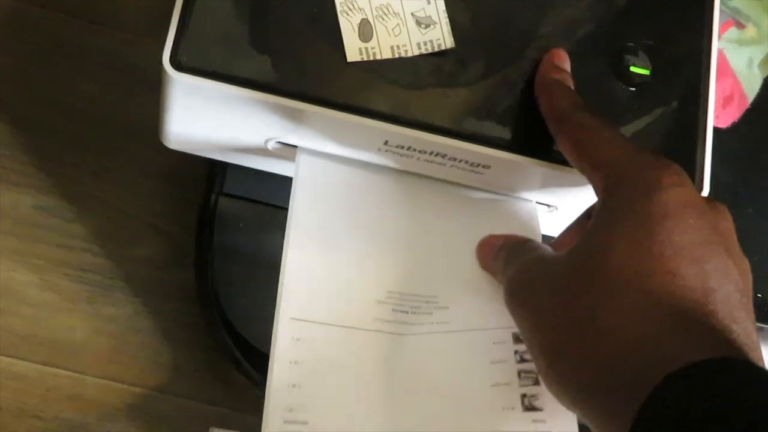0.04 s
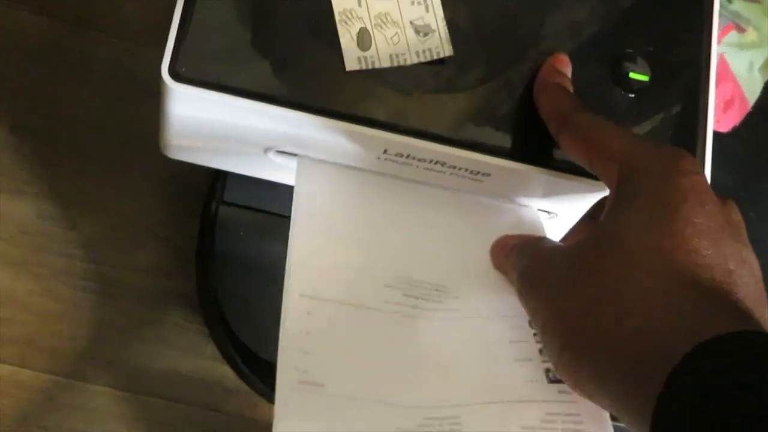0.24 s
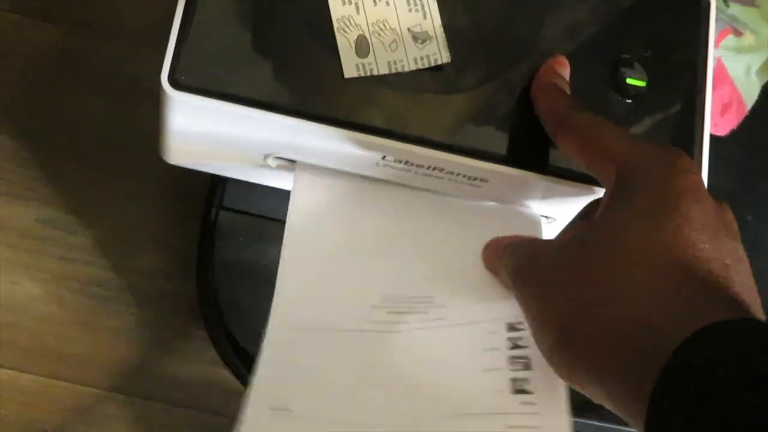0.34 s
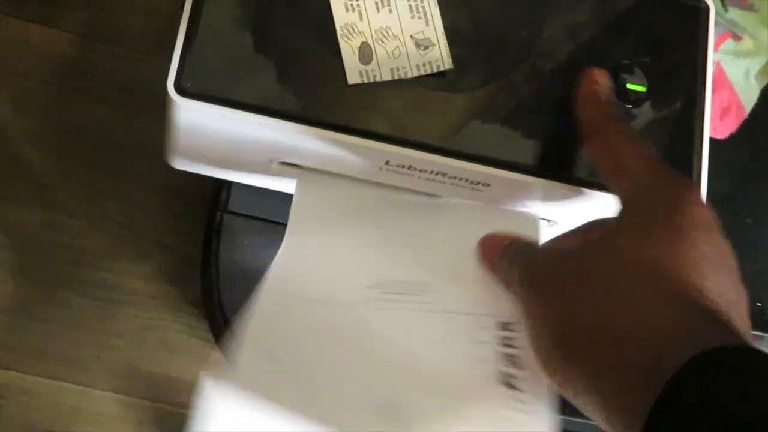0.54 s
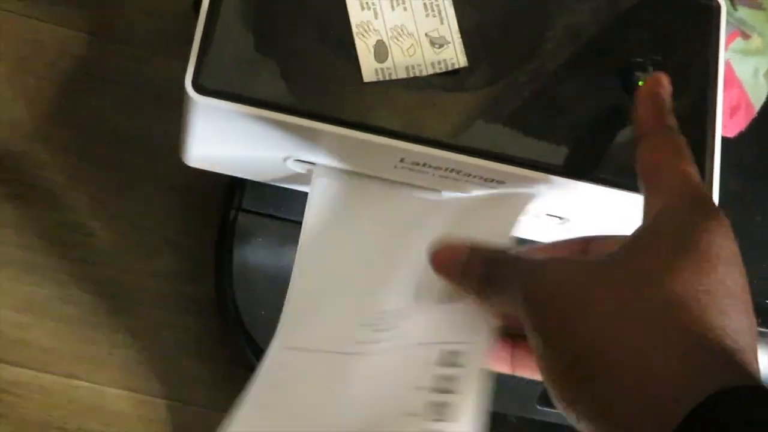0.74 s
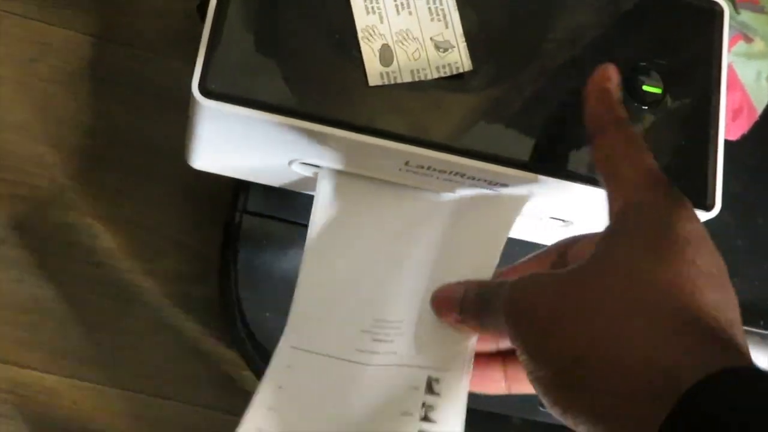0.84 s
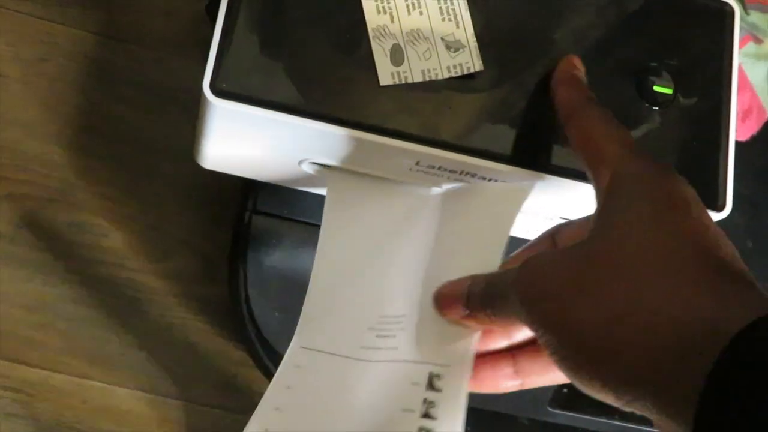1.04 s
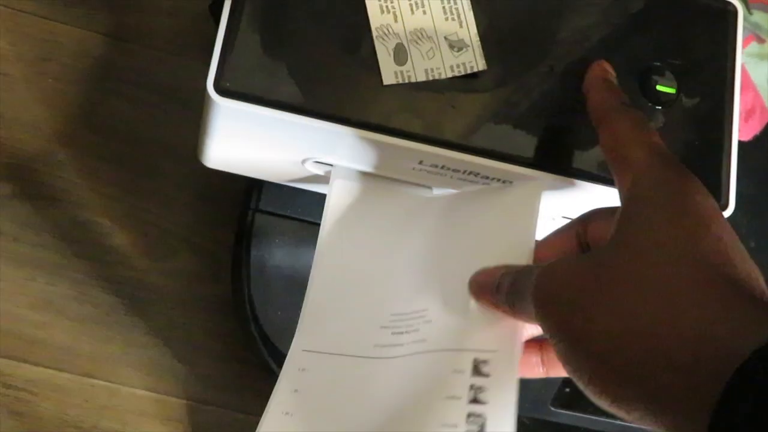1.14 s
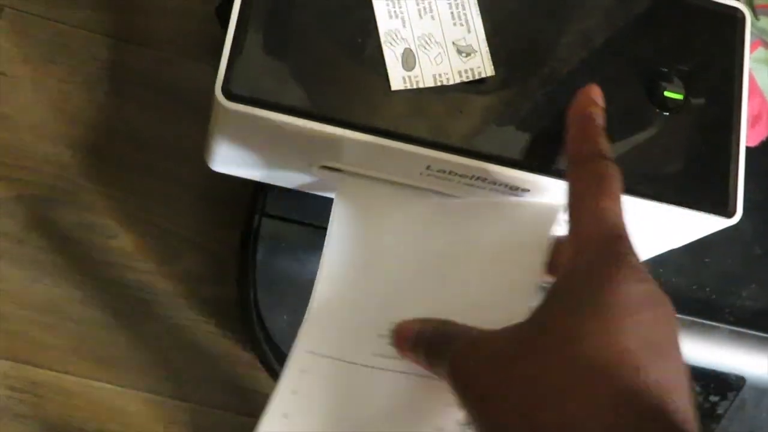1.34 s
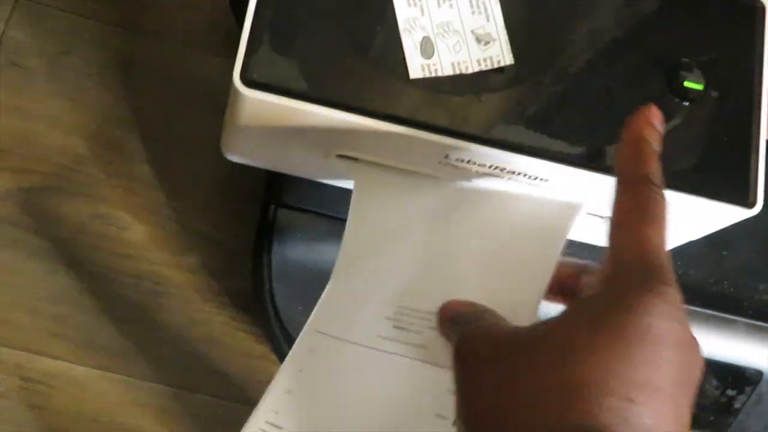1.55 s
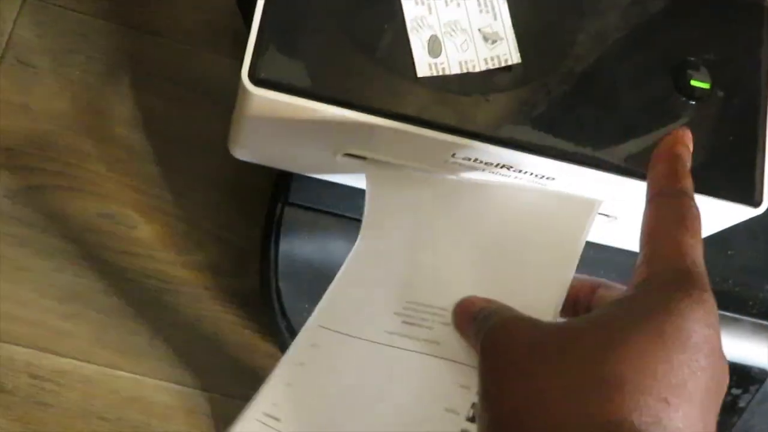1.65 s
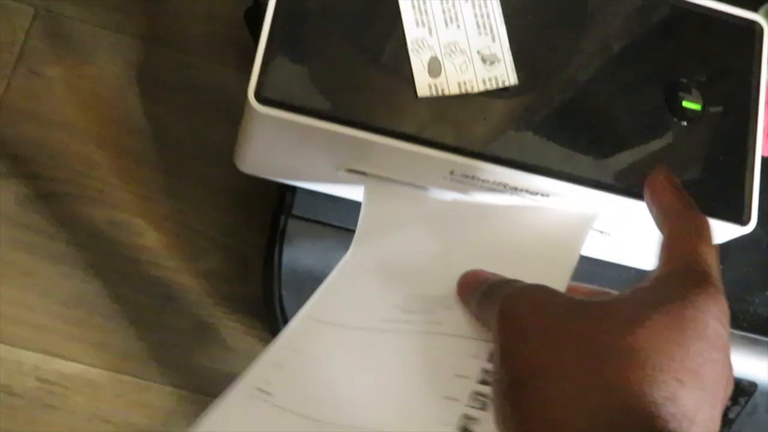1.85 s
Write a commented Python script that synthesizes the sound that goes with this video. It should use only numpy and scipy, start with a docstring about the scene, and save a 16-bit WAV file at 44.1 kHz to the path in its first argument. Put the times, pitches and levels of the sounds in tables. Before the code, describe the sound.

A paper label rips off a small printer in a quick loud burst, then crinkles faintly.

```python
"""In a small, quiet room, a paper label is torn along its perforation at a small printer, close by.
The printer drones and its roller creaks; then the paper bridges snap one by one, each a decaying
cosine pop with a noise crack. Fingers shift their grip: the slip crinkles in clumps of noise grains,
slides over the plastic case as clumped hiss and taps it, ringing its modes. A noise tail is the room."""
import sys
import numpy as np
from scipy import signal
from scipy.fft import rfft, irfft
from scipy.io import wavfile
from scipy.ndimage import uniform_filter1d

SR = 44100
rng = np.random.default_rng(int(sys.argv[2]) if len(sys.argv) > 2 else 0)


def store_pcm(level_fs):
    """Save levels as 16-bit WAV."""
    pcm = np.round(np.clip(level_fs, -1, 1) * 32767).astype(np.int16)
    wavfile.write(sys.argv[1], SR, np.atleast_2d(pcm).T)


N = 83790
T = np.arange(N) / SR


def amp(db):
    """Decibels to linear gain."""
    return 10 ** (np.asarray(db) / 20)


def unit(x):
    """Scale to an RMS of one."""
    return x / np.sqrt(np.mean(x ** 2) + 1e-20)


def read(points, hz):
    """Read a curve of (frequency, value) points along a log frequency axis."""
    f, value = np.transpose(points)
    return np.interp(np.log(hz + 1), np.log(f + 1), value)


def level(points):
    """Gain over time from (time [s], level [dB]) points."""
    return amp(np.interp(T, *np.transpose(points)))


def add(mix, s, sound):
    """Mix a sound in at s seconds, cut off at the end of the mix."""
    part = mix[round(s * SR):][:len(sound)]
    part += sound[:len(part)]


def colour(x, points, even=False, size=4096):
    """Causal filter through (frequency [Hz], gain [dB]) points; even keeps the power of white noise."""
    log_gain = np.log(amp(read(points, abs(np.fft.fftfreq(size, 1 / SR)))))
    minimum_phase = np.exp(np.conj(signal.hilbert(log_gain)))
    taps = np.fft.ifft(minimum_phase).real[:size // 2]
    if even:
        taps = taps / np.linalg.norm(taps)
    return signal.fftconvolve(x, taps)[:len(x)]


def resonances(x, modes):
    """Ring modes given as (frequency [Hz], gain at the peak [dB], t60 [s])."""
    out = np.zeros(len(x))
    for hz, db, t60 in modes:
        pole = amp(-60 / (t60 * SR))
        spin = np.exp(2j * np.pi * hz / SR)
        ringing = signal.lfilter([1 - pole], [1, -pole * spin], x + 1e-18)
        out += 2 * amp(db) * ringing.real
    return out


def grains(per_s, spread_db, smooth_share):
    """Tiny fibre clicks of uneven size over a smooth hiss."""
    sizes = amp(spread_db * np.minimum(rng.exponential(1, N), 3))
    clicks = sizes * rng.choice([-1, 1], N) * (rng.random(N) < per_s / SR)
    return unit(unit(clicks) + smooth_share * rng.standard_normal(N))


def drone(curve, spectrum):
    """Smooth coloured noise under a level curve."""
    return level(curve) * unit(colour(rng.standard_normal(N), spectrum))


# Low drone of the printer as the paper is drawn out: (time [s], level [dB])
DRAG_LEVEL = [(0, -61.5), (.06, -47), (.12, -57), (.18, -46), (.25, -39), (.35, -50), (.42, -58.5),
              (.55, -93)]
# Its colour: (frequency [Hz], gain [dB])
DRAG_COLOUR = [(20, 1.5), (75, -4.5), (120, -6.5), (400, -5), (485, 2.5), (560, -22), (1050, -13.5),
               (2500, -54)]


def dragging():
    """The drawn paper makes the printer drone: low noise that swells and fades."""
    return drone(DRAG_LEVEL, DRAG_COLOUR)


# Background swell, on top of AIR_DB: (time [s], level [dB])
AIR_LEVEL = [(0, 14), (.55, 3), (.76, -5.5), (1.0, 0.5), (1.9, 10.5)]
# Colour of the background: (frequency [Hz], gain [dB])
AIR_COLOUR = [(50, 0), (160, -4), (240, -1), (350, -12), (650, -13), (1200, -19), (2500, -23),
              (6000, -30.5), (16000, -48)]
AIR_DB = -58.5


def air():
    """Soft, mostly low background noise, sinking and then rising again."""
    return amp(AIR_DB) * drone(AIR_LEVEL, AIR_COLOUR)


# Crinkles of the handled slip:
# (time [s], level [dB], decay [s], low flap re level [dB], crisp top re level [dB]), before the colours
CRINKLES = [(0.022, -43.5, 0.002, 8, -1.5), (0.273, -37.5, 0.001, -5, 2.5),
            (0.2548, -36.5, 0.00095, -22, 4), (.326, -26.5, 0.007, -30, 1), (.669, -50, 0.003, 11, -36),
            (0.697, -46.5, 0.0088, -28, -12), (0.923, -38.5, 0.0058, 8, -4.5),
            (0.948, -45, 0.0084, -18, -4), (0.961, -42.5, 0.0074, 11.5, -0.5),
            (1.025, -42, 0.0071, 5.5, -2), (1.051, -43.5, 0.0067, 5, -6), (1.063, -41, 0.0051, -15, -7),
            (1.077, -36, 0.0098, -1, -4.5), (1.121, -42, 0.0038, -10, -20), (1.206, -45, 0.0034, -8, -18.5),
            (1.218, -45, 0.0072, 2, -13), (1.252, -40, 0.011, -16, -14.5), (1.402, -36.5, 0.0034, -1, -6),
            (1.605, -35.5, 0.0041, -5.5, 2.5), (1.617, -41, 0.0053, -3, -12), (1.7762, -34, 0.0026, 4.5, 4)]
# Colours of the three layers: (frequency [Hz], gain [dB])
CRINKLE_BODY = [(60, -17.5), (300, -14.5), (650, 0.5), (850, -7.5), (1200, 1), (2000, -6), (3200, -7),
                (5000, -22), (16000, -40)]
CRINKLE_FLAP = [(40, -14), (140, 3.5), (600, -0.5), (1000, -10.5), (16000, -62)]
CRINKLE_TOP = [(100, -43), (1500, -2.5), (3400, 4.5), (4500, -0.5), (11000, -14), (16000, -15.5)]
CRINKLE_GRAINS_PER_S, CRINKLE_SPREAD_DB, CRINKLE_SMOOTH_SHARE = 1800, 1.5, 0.17
RISE_SHARE, FLAP_SLOWER = 0.64, 1.67  # rise time as a share of the decay; flap decay as a multiple of it


def crinkling():
    """Buckling paper gives short clumps of grains, each with a slower low flap of the sheet."""
    t = np.arange(SR // 8) / SR
    body, flap, top = np.zeros((3, N))
    for s, db, decay, flap_db, top_db in CRINKLES:
        onset = amp(db) * np.minimum(t / decay / RISE_SHARE, 1)
        age = np.maximum(t / decay - RISE_SHARE, 0)
        add(body, s, onset * np.exp(-age))
        add(flap, s, amp(flap_db) * onset * np.exp(-age / FLAP_SLOWER))
        add(top, s, amp(top_db) * onset * np.exp(-age))
    clicks = grains(CRINKLE_GRAINS_PER_S, CRINKLE_SPREAD_DB, CRINKLE_SMOOTH_SHARE)
    crackle = colour(body * clicks, CRINKLE_BODY, True) + colour(top * clicks, CRINKLE_TOP, True)
    flutter = unit(colour(rng.standard_normal(N), CRINKLE_FLAP))
    return crackle + amp(-3.5) * flap * flutter  # all flaps sit 3.5 dB under their listed levels


# The feed roller creaks as the paper is drawn over it: (time [s], level [dB]), before the swell
CREAKS = [(.051, -40), (0.115, -42.5), (0.15, -47)]
CREAK_HZ, CREAK_S = 1020, 0.0024  # note, and time to the top of the swell


def creaking():
    """Each slip of the roller swells and dies on one faint note."""
    t, out = np.arange(SR // 10) / SR, np.zeros(N)
    for s, db in CREAKS:
        swell = t / CREAK_S * np.exp(1 - t / CREAK_S)
        add(out, s, amp(db) * swell * np.sin(2 * np.pi * CREAK_HZ * t))
    return out


GRAINS_PER_S, GRAIN_SPREAD_DB, SMOOTH_SHARE = 3500, 3, 0.4
CLUMP_DB, CLUMP_S = 3, 0.0026  # depth of the clumps, and spacing of their random levels


def rubbing(gain, spectrum):
    """Paper friction: grains that come in clumps a few milliseconds long."""
    knots = np.arange(0, T[-1] + .1, CLUMP_S)
    drive = grains(GRAINS_PER_S, GRAIN_SPREAD_DB, SMOOTH_SHARE)
    clumps = np.interp(T, knots, np.clip(rng.standard_normal(len(knots)), -2, 2))
    return colour(unit(drive * amp(CLUMP_DB * clumps)) * gain, spectrum, True)


# Fibres parting between the snaps: (time [s], level [dB])
FIBRES = [(.17, -55), (.22, -48), (.345, -38.5), (.365, -26), (.39, -48), (.50, -36), (.58, -54),
          (.77, -71), (.825, -57), (.87, -74), (.97, -52), (1.10, -57), (1.16, -78)]
# Their colour: (frequency [Hz], gain [dB])
FIBRE_COLOUR = [(60, -19), (400, 7.5), (1700, 1), (3000, -2.5), (5500, -12), (16000, -26.5)]


def parting():
    """Fibres pull apart as clumped grains under a level curve."""
    return rubbing(level(FIBRES), FIBRE_COLOUR)


BEND_S, BEND_HZ = 0.000793, 2000  # travel time across the sheet, and the pitch that keeps its timing


def bending(x):
    """Bending waves cross the sheet faster the higher they are, so each pop is a tiny falling chirp."""
    hz = np.fft.rfftfreq(N, 1 / SR)
    turns = BEND_S * (2 * np.sqrt(hz * BEND_HZ) - hz)
    return irfft(rfft(x) * np.exp(-2j * np.pi * turns), N)


# Perforation bridges snapping: (time [s], level [dB], pitch of the sheet [Hz], ring t60 [s],
# upper edge of the pop [Hz], crack re the pop [dB]), before the colours
SNAPS = [(0.2101, -20, 1190, 0.0028, 3200, -21), (0.2268, -10.5, 1330, 0.0028, 3140, -27.5),
         (0.241, -5.5, 1400, 0.00086, 3140, -29.5), (0.258, -8, 1380, 0.0029, 3170, -28),
         (0.279, -10, 1340, 0.0026, 3180, -24.5), (0.3008, -6.5, 1392, 0.0028, 3600, -26.5),
         (0.3475, -13, 2880, 0.002, 3994, -1), (0.3498, 3, 3410, 0.0037, 6000, -4),
         (0.3503, 7.5, 1820, 0.0041, 4250, -18), (0.3554, -1, 1620, 0.0046, 3250, -14),
         (0.3694, 1.5, 1450, 0.003, 4280, -13.5), (0.387, -2.5, 1300, 0.0041, 4300, -14),
         (0.4111, -3, 1051, 0.0034, 4130, -18.5), (.4130, -7, 1460, 0.002, 4020, -21.5),
         (0.4363, -1, 1420, 0.0024, 5070, -19), (0.439, 0, 1490, 0.0012, 4440, -24.5),
         (0.4587, -4, 2510, 0.00072, 5300, -29), (0.473, -13, 1250, .005, 4430, -21),
         (0.4769, -15, 1350, 0.006, 3600, -9.5), (0.487, -9.5, 1430, 0.011, 2890, -10),
         (0.5075, -3, 1470, 0.0021, 2500, -20), (0.516, -5.5, 1260, 0.0049, 2160, -28),
         (0.6592, -30, 1295, 0.0068, 2340, -39)]
# Colours of pop, crack and the after-ring of the sheet: (frequency [Hz], gain [dB])
POP_COLOUR = [(40, -11), (200, -2), (500, 5.5), (1200, 0), (2700, 4.5), (5000, 0.5), (16000, -17)]
CRACK_COLOUR = [(100, -22), (1500, -9.5), (4000, 6), (6000, -1.5), (9000, -5.5), (13000, -10), (16000, -16)]
SHIVER_COLOUR = [(60, -7.5), (230, 10.5), (450, 9.5), (900, 5), (1700, 2), (3000, -0.5), (6000, 4.5),
                 (16000, 0.5)]
CRACK_S = 0.0011  # the crack peaks after half of this
RIP_S = .34  # the main rip follows this moment
CASE_ECHO_S, CASE_ECHO_SHARE = .00053, 0.29
SHIVER_DB, SHIVER_T60 = -12.5, 0.022  # level before its colour; t60 in s


def tearing():
    """Each bridge breaks with a crack and pops the sheet like a drumhead, which shivers briefly."""
    t = np.arange(SR // 10) / SR
    pops, cracks = np.zeros((2, N))
    for s, db, hz, t60, edge_hz, crack_db in SNAPS:
        pop = amp(db - 60 * t / t60) * np.cos(2 * np.pi * hz * t)
        pop = signal.sosfilt(signal.butter(4, edge_hz, fs=SR, output="sos"), pop)
        add(pops, s, pop)
        if s < RIP_S:  # until the main rip, the sheet lies close to the case, which throws each pop back inverted
            add(pops, s + CASE_ECHO_S, -CASE_ECHO_SHARE * pop)
        burst = 2 * t / CRACK_S * np.exp(.5 - 2 * t / CRACK_S)
        add(cracks, s, amp(db + crack_db) * burst * rng.standard_normal(len(t)))
    snaps = bending(colour(pops, POP_COLOUR) + colour(cracks, CRACK_COLOUR, True))
    ring = rng.standard_normal(len(t)) * amp(-60 * t / SHIVER_T60) * np.minimum(t / 0.0035, 1)
    shiver = signal.fftconvolve(snaps, ring / np.linalg.norm(ring))[:N]
    return snaps + amp(SHIVER_DB) * colour(shiver, SHIVER_COLOUR)


# The taut sheet booms as it is tugged, comes free and is flexed: (time [s], level [dB])
TUGS = [(0.21, -26.5), (0.242, -24.5), (0.279, -25.5), (0.3508, -19.5), (0.509, -32), (1.036, -32)]
BOOM_HZ, BOOM_T60 = 236, 0.052  # t60 in s


def booming():
    """The lowest mode of the stretched sheet, a decaying sine at each tug."""
    t, out = np.arange(SR // 8) / SR, np.zeros(N)
    for s, db in TUGS:
        add(out, s, amp(db - 60 * t / BOOM_T60) * np.sin(2 * np.pi * BOOM_HZ * t))
    return out


# The rip jolts the plastic case; the slip and fingers tap it:
# (time [s], push level before the low cut [dB], contact time [s], level of the thud [dB])
TAPS = [(0.3508, -16.5, 0.001, -26.5), (0.673, -36, 0.00035, -50), (0.9253, -29.5, 0.00026, -41),
        (0.9303, -38, 0.00028, -51), (0.9642, -28, 0.00013, -53), (1.259, -44, .0004, -40.5),
        (1.378, -30.5, 0.00012, -50), (1.407, -25.5, 0.000051, -52), (1.4558, -28.5, 0.00015, -41.5),
        (1.4598, -24.5, 0.00018, -44), (1.8603, -26.5, 0.00016, -34), (1.866, -31, 0.00023, -49)]
# Modes of the case: (frequency [Hz], gain at the peak [dB], t60 [s])
CASE = [(440, -0.5, 0.053), (652, 6, 0.067), (965, 1, 0.066), (1264, 7, 0.036), (2745, 10, 0.044)]
THUD_HZ, THUD_T60, TAP_LOW_HZ = 111, 0.056, 220.3  # t60 in s; low cut of the pushes


def tapping():
    """A short push, duller the longer the contact, rings the case and thuds into the desk."""
    t = np.arange(SR // 10) / SR
    pushes, thuds = np.zeros((2, N))
    for s, db, contact, thud_db in TAPS:
        add(pushes, s, amp(db) * (t / contact * np.exp(1 - t / contact)) ** 2)
        add(thuds, s, amp(thud_db - 60 * t / THUD_T60) * np.sin(2 * np.pi * THUD_HZ * t))
    pushes = signal.sosfilt(signal.butter(2, TAP_LOW_HZ, "highpass", fs=SR, output="sos"), pushes)
    return pushes + resonances(pushes, CASE) + thuds


# Paper sliding over the case: (time [s], level [dB])
SLIDE = [(1.36, -66.5), (1.395, -51.5), (1.415, -63.5), (1.47, -56), (1.60, -87), (1.635, -47.5),
         (1.685, -37), (1.757, -38), (1.79, -42.5), (1.83, -65)]
# Its colour: (frequency [Hz], gain [dB])
SLIDE_COLOUR = [(50, -8.5), (400, -7), (600, -1.5), (800, -13), (970, 1), (1250, -9.5), (1600, 4.5),
                (2050, 0.5), (2330, -3.5), (2620, -1.5), (3600, -7.5), (7500, -18), (14000, -23.5),
                (16000, -31.5)]
# The sliding slip catches on the case: (time [s], level [dB])
CATCHES = [(1.638, -28), (1.669, -31.5), (1.681, -30), (1.695, -30.5), (1.706, -31.5), (1.722, -32.5),
           (1.737, -31.5), (1.757, -36.5)]
# Resonances of the flat and the bowed sheet: (frequency [Hz], gain at the peak [dB], t60 [s])
FLAT_HISS = [(10000, 1.6, 0.0036)]
BOWED_RASP = [(4700, 0.81, 0.0025)]
CATCH_S = .002  # rise and fall time constant of a catch
BOW_AT_S, BOW_S = 1.712, 0.009  # middle and time constant of the change from flat to bowed


def sliding():
    """The slip drags, catches and lets go; its thin hiss gives way to a lower rasp as the sheet bows."""
    catches = sum(amp(db) * np.exp(-abs(T - s) / CATCH_S) for s, db in CATCHES)
    rub = rubbing(level(SLIDE) + catches, SLIDE_COLOUR)
    bowed = .5 + .5 * np.tanh((T - BOW_AT_S) / BOW_S)
    return rub + resonances(rub * (1 - bowed), FLAT_HISS) + resonances(rub * bowed, BOWED_RASP)


# The hollow of the printer: (frequency [Hz], gain at the peak [dB])
HOLLOW = [(732, -2.5), (927, -8.5), (1092, -6.5), (1440, -10), (1498, -9.5), (1636, -9.5), (1788, -11),
          (2022, -2.5), (2185, -5), (2604, -3)]
HOLLOW_T60 = .16  # s


def hollow(x):
    """The air in the printer rings along with the paper."""
    return resonances(x, [(hz, db, HOLLOW_T60) for hz, db in HOLLOW])


# Decay of the room: (frequency [Hz], t60 [s])
ROOM_T60 = [(100, 0.32), (2300, 0.4), (16000, 0.17)]
# Colour of the room: (frequency [Hz], gain [dB])
ROOM_COLOUR = [(50, -4), (220, 7), (800, -8.5), (2200, -5.5), (3000, -10), (16000, 5.5)]
ROOM_DB, ROOM_DELAY_S = -15.5, 0.0014  # level before its colour; silence, then a fade-in as long


def room(x):
    """A diffuse noise tail, each band dying at its own speed."""
    hz, t, z = signal.stft(rng.standard_normal(SR * 3 // 4), SR, nperseg=256)
    tail = signal.istft(z * amp(-60 * t / read(ROOM_T60, hz)[:, None]), SR)[1]
    tail = tail * np.clip(np.arange(len(tail)) / SR / ROOM_DELAY_S - 1, 0, 1)
    wet = signal.fftconvolve(x, tail / np.linalg.norm(tail))[:N]
    return amp(ROOM_DB) * colour(wet, ROOM_COLOUR)


# Stereo width of the diffuse sound: (frequency [Hz], gain of the side [dB])
WIDTH = [(40, -22.5), (130, -19.5), (260, -10), (600, -1.5), (1600, -8.5), (5000, -4), (13000, 3)]
PORT_HZ = 13000  # above this the two ports hear the paper out of step
WANDER_S = 0.0074  # smoothing time of the random bearing


def scene():
    """Two close ports hear nearly the same bass; the treble is out of step as the crackle moves about."""
    paper = creaking() + tearing() + booming() + crinkling() + tapping() + sliding() + parting()
    mid = paper + hollow(paper) + room(paper) + dragging() + air()
    hz = np.fft.rfftfreq(N, 1 / SR)
    # the bearing flips at random between the two sides
    bearing = np.sign(uniform_filter1d(rng.standard_normal(N), round(WANDER_S * SR)))
    out_of_step = irfft(rfft(paper) * 1j * hz / np.hypot(hz, PORT_HZ), N)
    direct = out_of_step * unit(uniform_filter1d(bearing, size=32))
    diffuse = room(paper) + air()
    side = direct + irfft(rfft(diffuse) * amp(read(WIDTH, hz)), N)
    return np.array([mid + side, mid - side])


OVERLOAD = 0.78  # clipping level before the band limit
EDGE_HZ = 15900  # band limit


def record(dry):
    """Overload flattens the highest peaks; a steep low-pass then limits the band."""
    clipped = np.clip(dry, -OVERLOAD, OVERLOAD)
    low_pass = signal.firwin(511, EDGE_HZ, window=("kaiser", 9), fs=SR)
    return signal.oaconvolve(clipped, low_pass[None], "same")


dry = scene()
out = record(dry)
store_pcm(out)
```